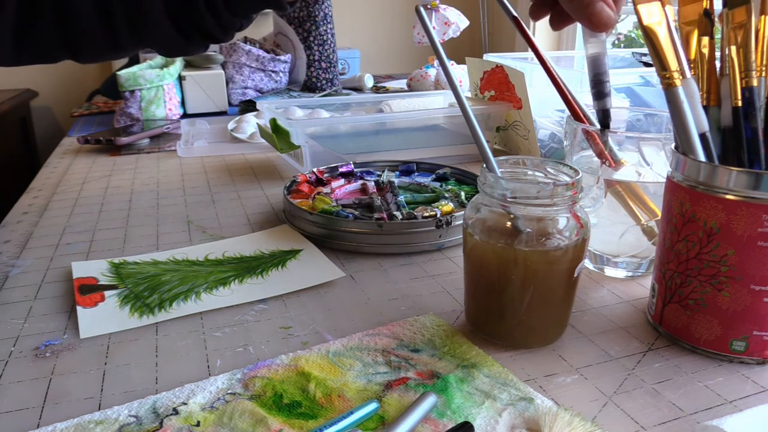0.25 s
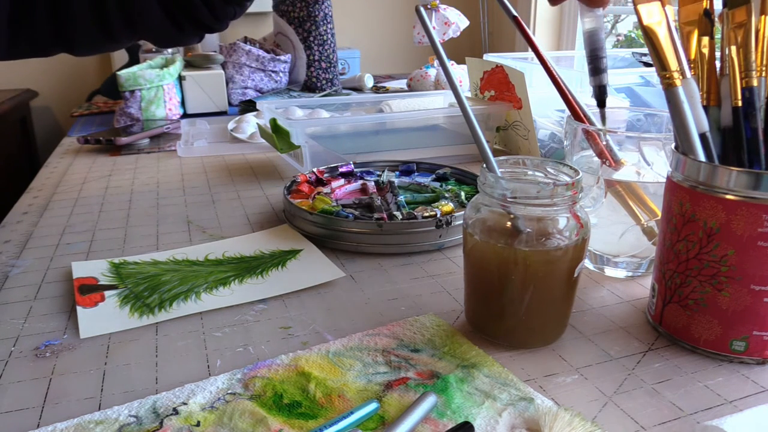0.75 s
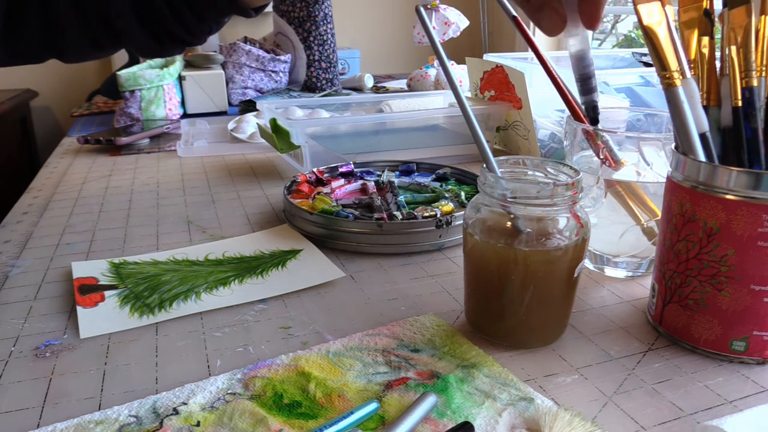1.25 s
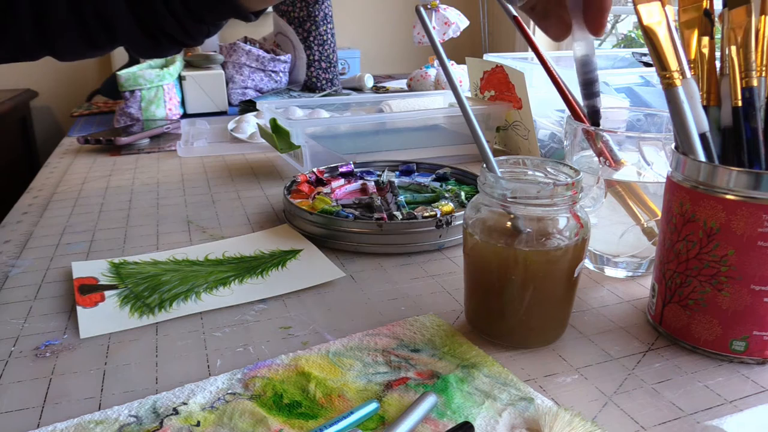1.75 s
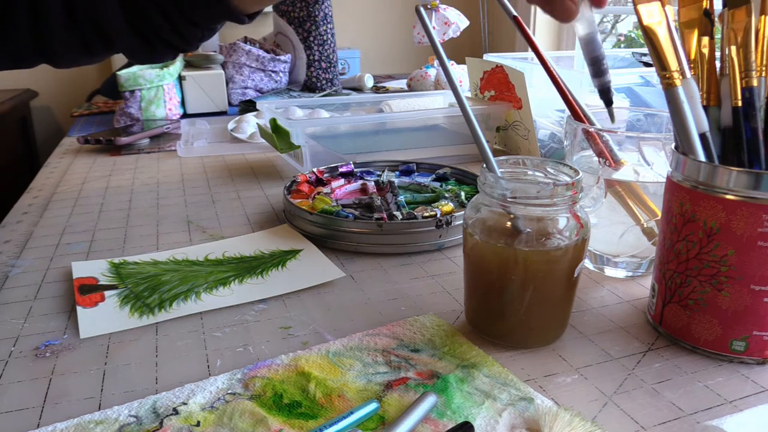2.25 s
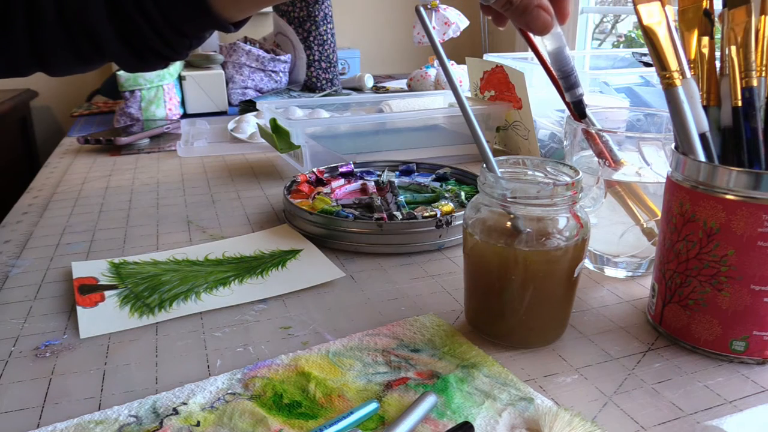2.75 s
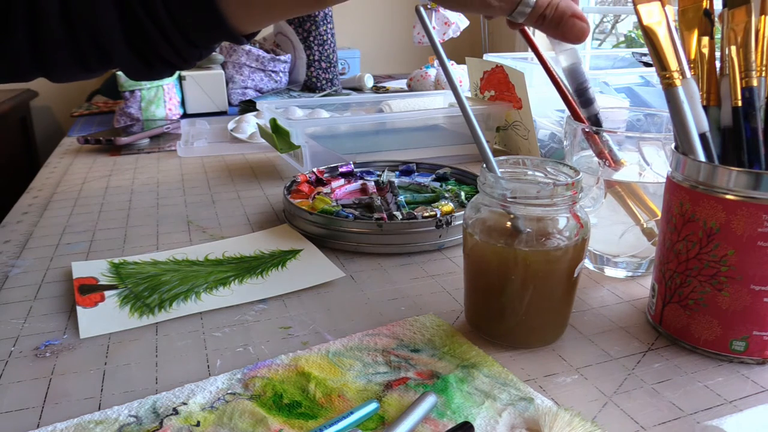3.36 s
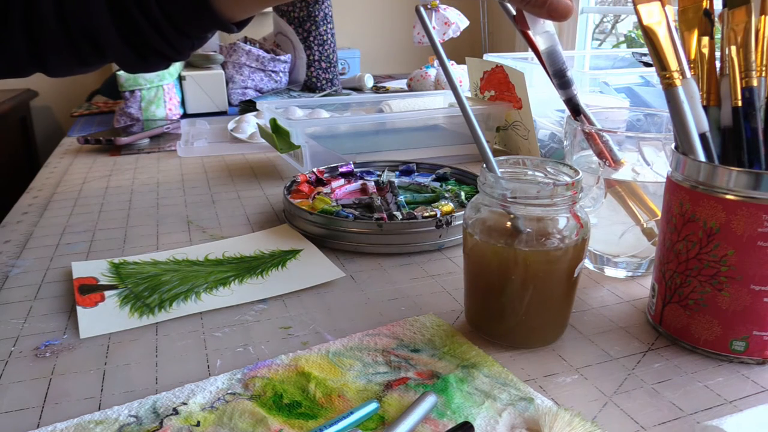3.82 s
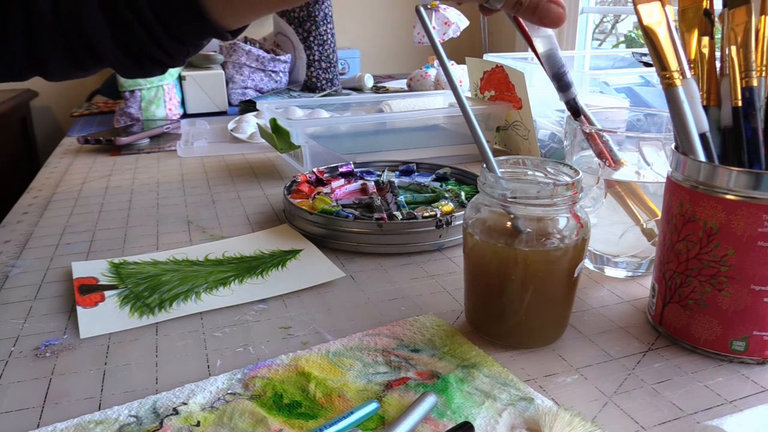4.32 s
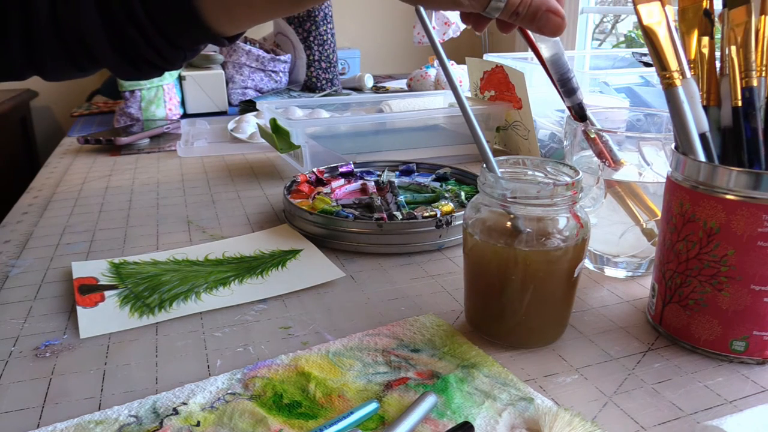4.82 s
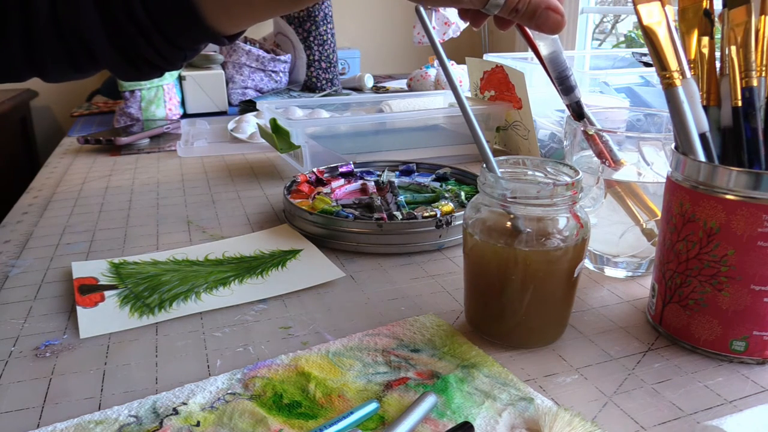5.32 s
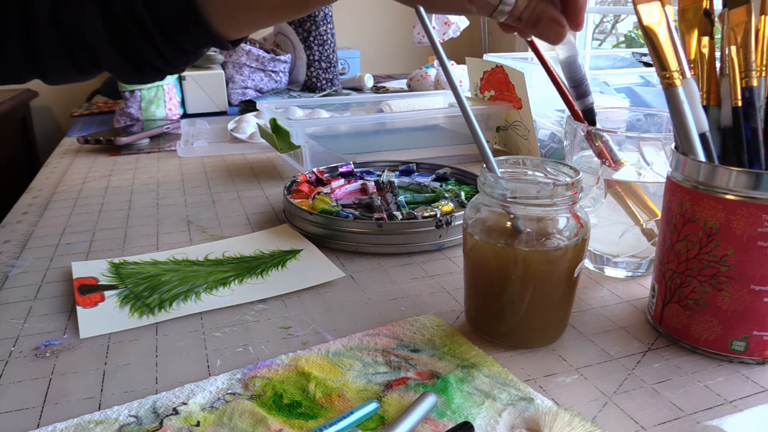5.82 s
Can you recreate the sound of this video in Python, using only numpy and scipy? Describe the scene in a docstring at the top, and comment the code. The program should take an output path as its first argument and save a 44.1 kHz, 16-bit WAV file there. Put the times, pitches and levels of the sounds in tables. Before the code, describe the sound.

A quiet small room with a faint, wide, soft hiss and a barely audible low hum throughout. Near the microphone, a paintbrush handle taps a glass jar holding water on a table. Two bright clinks come almost at once, at 0.06 and 0.16 seconds. Another strong one sounds at 1.06, with a weaker tap at 1.2. A muffled low bump follows at 1.46, then a clear, sparkling clink at 1.8 and a barely noticeable bump at 1.9. At 2.4 and 3.4 the taps are rounder, softer-edged and ring longer; a crisp lighter one follows at 3.5. Single bright clinks come at 4.2 and 4.65. Dull, heavy bumps thud softly at 5.05, 5.2 and 5.55, and a very faint, mellow clink closes at 5.8. Every clink is a small dry click, a short glassy ring and a slight table knock, with a brief room tail.

```python
"""Brush rinsed in a glass jar

A paintbrush is rinsed in a glass water jar on a craft table; its handle clinks on the wall eleven times.
Each clink sums damped glass modes, a noise-burst click and the table's modes, carried by a small room.
Dull bumps are wavering low modes. Shaped noise and two sines make a faint hiss and hum.
"""
import sys
import numpy as np
from scipy import signal
from scipy.fft import rfft, irfft, next_fast_len
from scipy.io import wavfile
from scipy.ndimage import map_coordinates

SR = 44100
rng = np.random.default_rng(int(sys.argv[2]) if len(sys.argv) > 2 else 0)


def dump_mix(stems):
    """Bounce the given channels to the path in sys.argv[1] as a 16-bit WAV at rate SR."""
    frames = np.atleast_2d(stems).T  # one column per channel
    limited = np.clip(frames, -1, 1)  # hard clip at full scale
    pcm = np.round(limited * 32767).astype(np.int16)
    wavfile.write(sys.argv[1], SR, pcm)


N = 268216
TIME = np.arange(N) / SR
RING = TIME[:SR // 2]  # time axis of one event, cut at 0.5 s


def amp(db):
    """Decibels to gain."""
    return 10 ** (np.asarray(db) / 20)


def unit(x):
    """x scaled to rms 1."""
    return x / np.sqrt(np.mean(x ** 2) + 1e-20)


def along(points, hz):
    """(Hz, value) points read on a log frequency axis, ends held."""
    f, v = np.transpose(points)
    return np.interp(np.log(hz + 1), np.log(f + 1), v)


def fade(t, t60):
    """A decay that loses 60 dB in t60 seconds."""
    return np.exp(-np.log(1000) * t / t60)


def wobble(rate_hz):
    """A smooth random curve, rate_hz knots a second."""
    knots = rng.standard_normal(int(N * rate_hz / SR) + 4)
    coarse = TIME[::64]
    return np.interp(TIME, coarse, map_coordinates(knots, [coarse * rate_hz]))


def filtered(x, response):
    """x times a response of frequency."""
    n = x.shape[-1]
    m = next_fast_len(n + SR // 4)
    return irfft(rfft(x, m) * response(np.fft.rfftfreq(m, 1 / SR)), m)[..., :n]


def noise(spectrum, size):
    """Coloured noise of rms 1."""
    return unit(filtered(rng.standard_normal(size), lambda hz: amp(along(spectrum, hz))))


def add(track, s, sound):
    """Mix a sound into the track from time s."""
    part = track[:, max(round(s * SR), 0):][:, :sound.shape[-1]]
    part += sound[..., :part.shape[1]]


# diffuse sound: (frequency [Hz], left-right correlation [-1 to 1])
LIKENESS = [(60, 0.19), (130, 0.66), (290, 0.33), (640, -0.43), (1410, -0.25), (3100, 0.45), (6820, 0.66),
            (15000, 0.58)]


def wide_noise(spectrum):
    """Stereo noise of rms 1: the mid-side balance sets the correlation in each band."""
    def mid_side_gains(hz):
        turn = np.arccos(np.clip(along(LIKENESS, hz), -1, 1)) / 2
        return np.array([np.cos(turn), np.sin(turn)])
    mid, side = filtered(noise(spectrum, size=(2, N)), mid_side_gains)
    return unit(np.array([mid + side, mid - side]))


# room hiss: (frequency [Hz], relative density [dB per Hz])
AIR_SPECTRUM = [(15, -52), (25, -15.5), (73, -12.5), (116, -5), (228, -2.5), (268, -4), (299, -3.5),
                (413, -5), (447, -4.5), (727, -1.5), (788, -5), (1120, -6), (2140, -12), (4930, -17),
                (15700, -29)]


def room_air():
    """Diffuse coloured noise whose level drifts slightly."""
    return amp(-58.31 + 0.38 * wobble(3.07)) * wide_noise(AIR_SPECTRUM)


# hum partials: (frequency [Hz], peak level [dB])
HUM_PARTIALS = [(113, -78.5), (226, -78.5)]


def hum():
    """Steady sines, slightly wavering in level and phase."""
    out = np.zeros(N)
    for hz, db in HUM_PARTIALS:
        level = amp(db + 1.07 * wobble(4.0))
        out += level * np.sin(2 * np.pi * hz * TIME + 1.26 * wobble(8.2))
    return out


# direct sound and nearby surfaces: (delay [s], left gain, right gain)
REFLECTIONS = [(0, 0.39, 0.41), (.0015, 0.35, 0.94), (.0035, 0.42, 1), (0.012, .35, 0.26),
               (0.0246, 0.15, 0.18)]
# diffuse tail: (frequency [Hz], t60 [s])
TAIL_T60 = [(150, 0.2), (500, 0.63), (2000, 0.39), (4000, 0.33), (7000, 0.24), (11000, 0.19)]


def room(wet_db, build_s):
    """Stereo response: direct sound, near surfaces, then a diffuse tail that builds up and dies by frequency."""
    hz, t, z = signal.stft(rng.standard_normal((2, len(RING))), SR, nperseg=256)
    decay = fade(t, along(TAIL_T60, hz)[:, None])
    tail = signal.istft(z * decay, SR, nperseg=256)[1][:, :len(RING)]
    tail = tail * (1 - np.exp(-RING / build_s))
    response = amp(wet_db) * tail / np.linalg.norm(tail[0])
    for delay_s, left, right in REFLECTIONS:
        response[:, round(delay_s * SR)] += left, right
    return response


def placed(x, response):
    """x sounding in the room, with rms 1 over its first 30 ms."""
    wet = signal.fftconvolve(x[None], response, axes=1)[:, :len(RING)]
    return wet / np.sqrt(np.mean(wet[:, RING < .03] ** 2))


def swell(rise_s):
    """The rise of a vibration as the blow spreads through the body."""
    return 1 - np.exp(-RING / rise_s)


def ring(modes, length, scatter_db, detune):
    """Damped sines; mode strength, pitch and start phase vary from blow to blow."""
    out = np.zeros(len(RING))
    for hz, db, t60 in modes:
        a, b, phase = rng.standard_normal(3)
        envelope = amp(db + scatter_db * a) * fade(RING, t60 * length)
        out += envelope * np.sin(2 * np.pi * hz * (1 + detune * b) * RING + phase)
    return out


def by_hardness(ends, hardness):
    """Setting between its soft and hard ends."""
    return np.interp(hardness, [0, 1], ends)


# glass wall bending modes, four groups: (frequency [Hz], relative level [dB], t60 before damping factor [s])
LOWEST_MODES = [(1910, -16.5, 0.087), (1946, -4.5, 0.13), (2000, -2, 0.22), (2044, -5, 0.11),
                (2158, -13, 0.093), (2310, -15, 0.086)]
SECOND_MODES = [(3620, -36, 0.048), (3910, -21, 0.041), (3929, -3.5, 0.13), (4008, -1.5, 0.13),
                (4137, -6.5, 0.088)]
THIRD_MODES = [(6825, 0, .09), (6960, -15, .05), (7200, -13, .05)]
FOURTH_MODES = [(8990, -16, .05), (9578, -13, .08), (9700, -20, .05), (10385, 0, .1), (14570, -29, .1)]
# group level over the lowest group: (soft contact [dB], hard contact [dB])
SECOND_LEVEL = (-20, -2)
THIRD_LEVEL = (-33.5, -11.5)
FOURTH_LEVEL = (-29, -15)


def glass_ring(hardness, spot_db, length, space, near):
    """Wall modes: contact point shifts strengths, sloshing water shifts pitch, hardness feeds the treble."""
    rise = swell(rise_s=0.00053)
    second_gain = amp(by_hardness(SECOND_LEVEL, hardness))
    third_gain = amp(by_hardness(THIRD_LEVEL, hardness))
    left_right_db = np.array([[-2.5], [2.5]])
    fourth_gain = amp(by_hardness(FOURTH_LEVEL, hardness) + spot_db + left_right_db)
    lowest = ring(LOWEST_MODES, length, scatter_db=2.0, detune=0.001)
    second = ring(SECOND_MODES, length, scatter_db=2.5, detune=0.00082)
    third = ring(THIRD_MODES, length, scatter_db=3.5, detune=0.00025)
    fourth = ring(FOURTH_MODES, length, scatter_db=4.5, detune=0.00026)
    glass = placed(rise * lowest, space)
    glass += second_gain * placed(rise * second, space)
    glass += third_gain * placed(rise * third, space)
    glass += fourth_gain * placed(rise * fourth, near)
    return glass


# handle colour: (frequency [Hz], relative density [dB per Hz])
CLICK_SPECTRUM = [(300, -30), (900, -15.5), (1500, -10.5), (2250, 12), (2550, 6), (2900, 5.5), (3200, -2),
                  (3550, 6.5), (4500, -0.5), (5800, -15), (7500, -8.5), (9500, -7), (11000, -28),
                  (15000, -31)]
# click level over the tap's strength: (soft contact [dB], hard contact [dB])
CLICK_LEVEL = (-16, -6.5)


def handle_click(hardness, near):
    """Dry noise burst through the handle's minimum-phase colour: nothing sounds ahead of the blow."""
    size = len(RING)
    log_gain = np.log(amp(along(CLICK_SPECTRUM, np.fft.rfftfreq(size, 1 / SR))))
    cepstrum = irfft(log_gain, size)
    causal = np.exp(rfft(2 * cepstrum[:size // 2], size))
    burst = rng.standard_normal(size) * fade(RING, t60=0.0083)
    click = irfft(causal * rfft(burst), size)
    return amp(by_hardness(CLICK_LEVEL, hardness)) * placed(click, near)


# table modes: (frequency [Hz], relative level [dB], t60 before damping factor [s])
TABLE_MODES = [(380, -0.5, 0.11), (463, 5, 0.042), (513, -3, 0.07), (830, -4, 0.021)]
# knock level over the tap's strength: (soft contact [dB], hard contact [dB])
KNOCK_LEVEL = (-18, -24)


def table_knock(hardness, length, near):
    """The table's modes swell in under the jar; a soft contact pushes them more."""
    knock = swell(rise_s=0.0033) * ring(TABLE_MODES, length, scatter_db=2, detune=0.0079)
    return amp(by_hardness(KNOCK_LEVEL, hardness)) * placed(knock, near)


# handle meets glass: (time [s], strength [dB], contact hardness [0-1], struck spot's boost of highest modes [dB])
HANDLE_TAPS = [(0.0648, -36, 0.98, -4), (0.1572, -36.5, 0.73, -5), (1.0612, -34.5, 0.94, 4.5),
               (1.2063, -46, 0.6, 4), (1.8109, -34, 0.72, 6), (2.42, -37.5, 0.05, 2),
               (3.3732, -36, 0.19, -3.5), (3.5294, -40, 0.94, 3), (4.1888, -39.5, 0.84, -3),
               (4.649, -39, 0.75, 0), (5.8319, -47.5, .05, 4)]
# damping factor on mode t60s: (soft contact, hard contact)
DAMPING = (0.84, 0.49)


def clinks():
    """Each tap clicks, rings the glass and knocks the table; harder is brighter and shorter."""
    out = np.zeros((2, N))
    for s, strength_db, hardness, spot_db in HANDLE_TAPS:
        length = by_hardness(DAMPING, hardness)
        space = room(wet_db=-0.5, build_s=0.0072)
        # click and highest modes beam at the microphone: less room
        near = room(wet_db=-3, build_s=0.0033)
        clink = glass_ring(hardness, spot_db, length, space, near)
        clink += handle_click(hardness, near)
        clink += table_knock(hardness, length, near)
        add(out, s, amp(strength_db) * clink)
    return out


# dull bumps: (time [s], level [dB], t60 before mode share [s])
BUMP_EVENTS = [(1.463, -52, 0.25), (1.931, -64, 0.34), (5.052, -48.5, 0.82), (5.183, -50.5, 0.3),
               (5.561, -55.5, 0.29)]
# low modes: (frequency [Hz], relative level [dB], share of the bump's t60)
LOW_MODES = [(71.4, -12, 0.62), (111, -0.5, 0.8), (129, -2, 0.55), (181, -6, 0.9), (216, -7.5, 0.87),
             (238.5, -6, 1.4), (288, -8, 0.97)]


def bumps():
    """Soft, heavy bumps: only low modes answer; they swell in and waver in phase as they die."""
    out = np.zeros((2, N))
    for s, db, t60 in BUMP_EVENTS:
        body = np.zeros(len(RING))
        for hz, level_db, share in LOW_MODES:
            waver = 0.61 * wobble(39)[:len(RING)]
            tone = np.sin(2 * np.pi * (hz * RING + rng.random()) + waver)
            body += amp(level_db) * fade(RING, t60 * share) * tone
        add(out, s, amp(db) * body * swell(rise_s=0.018))
    return out


def scene():
    """Everything at the table."""
    return room_air() + hum() + clinks() + bumps()


def record(dry):
    """+1.5 dB up to 13 kHz, then the treble falls away gently and stops at the band limit."""
    top_hz = 15800
    return filtered(dry, lambda hz: amp(along([(13000, 1.5), (15700, -4.5)], hz)) * (hz < top_hz))


dry = scene()
out = record(dry)
dump_mix(out)
```